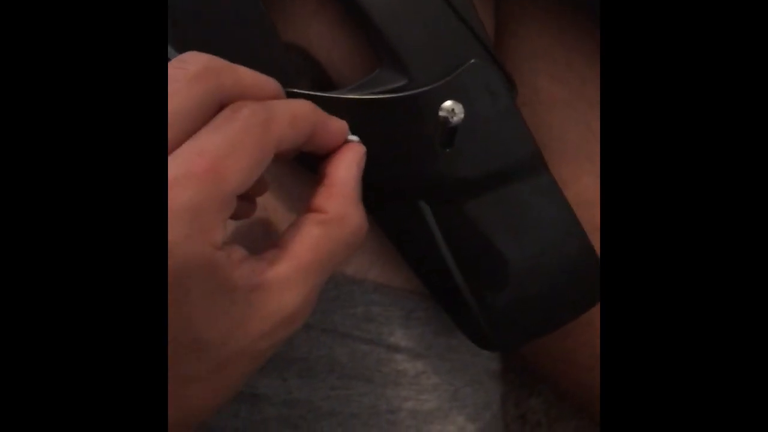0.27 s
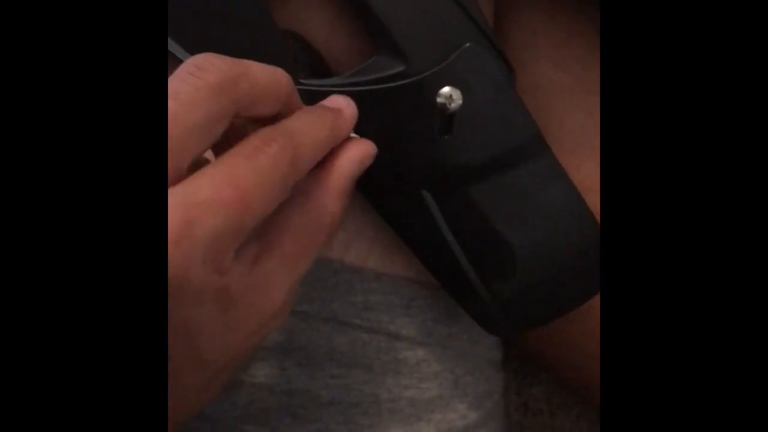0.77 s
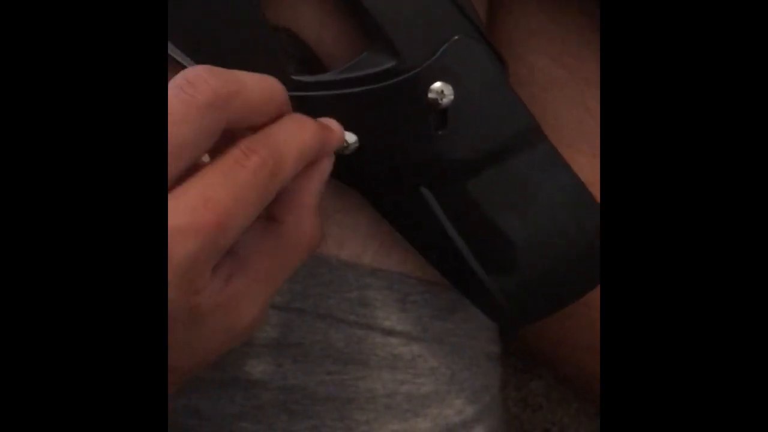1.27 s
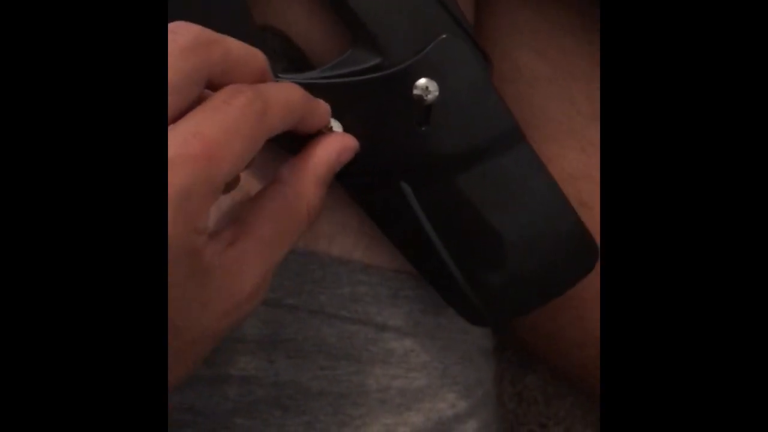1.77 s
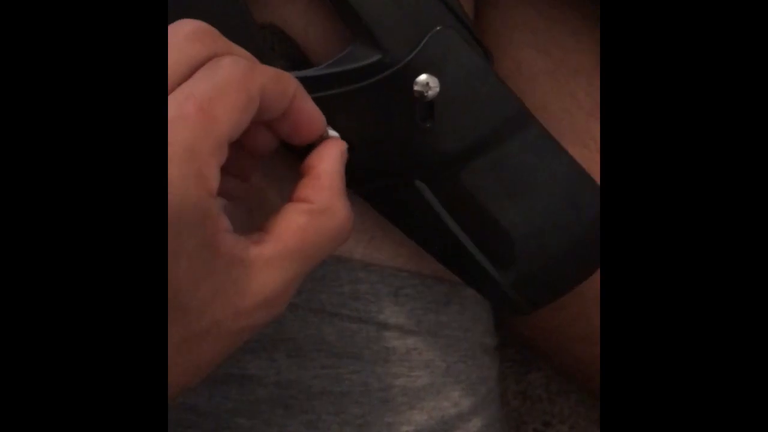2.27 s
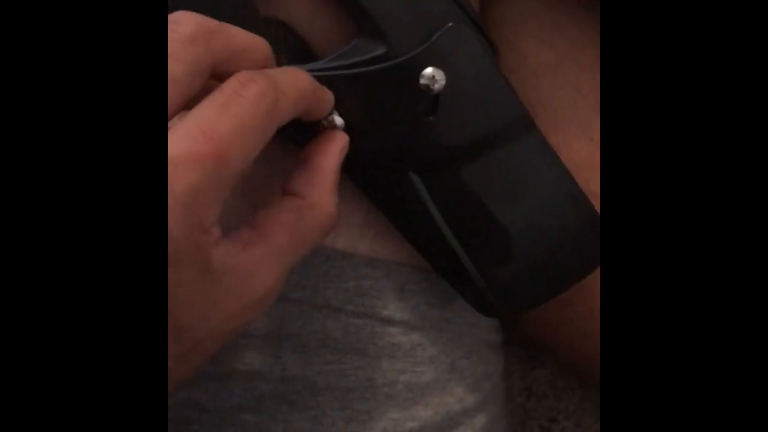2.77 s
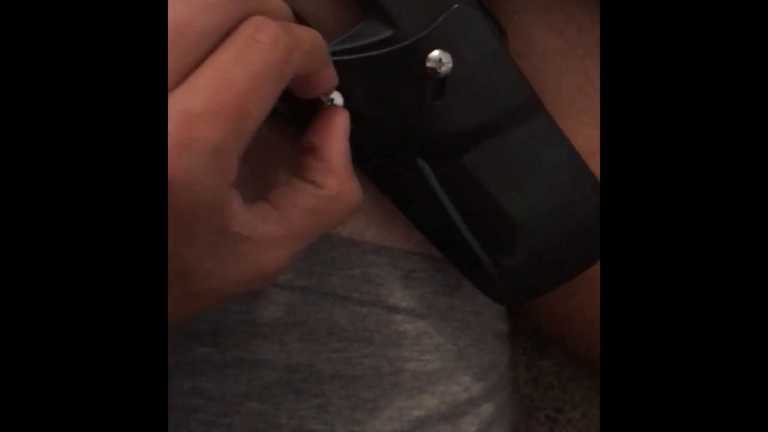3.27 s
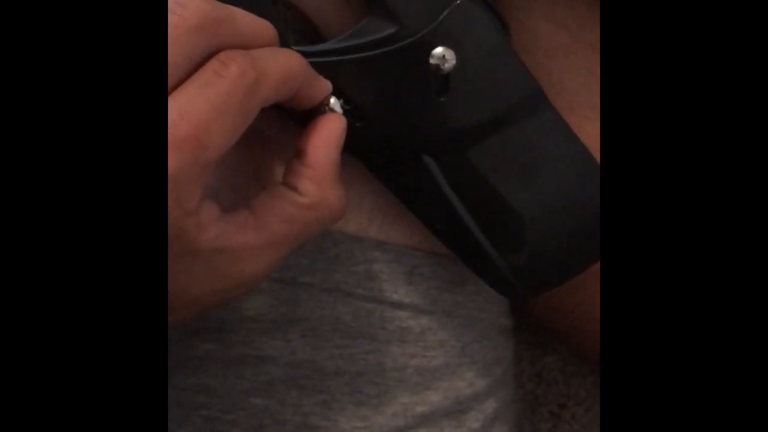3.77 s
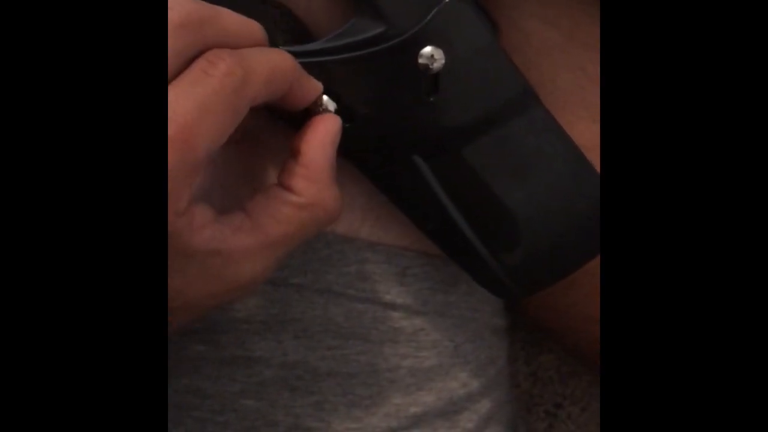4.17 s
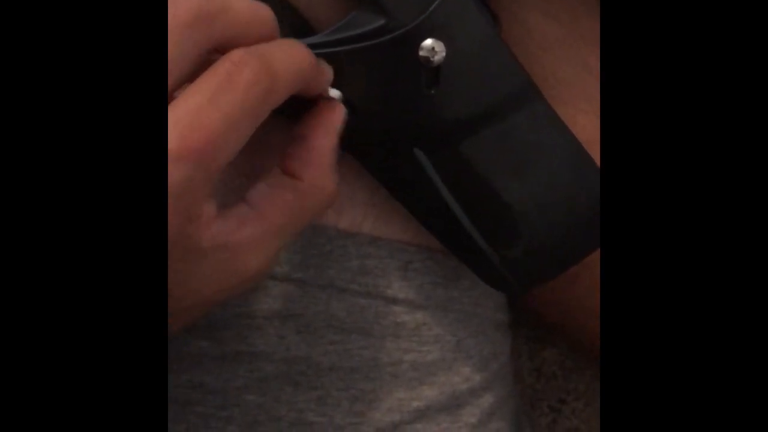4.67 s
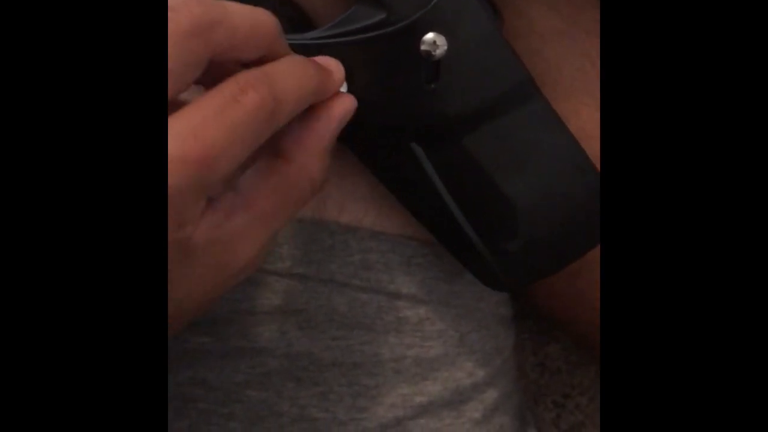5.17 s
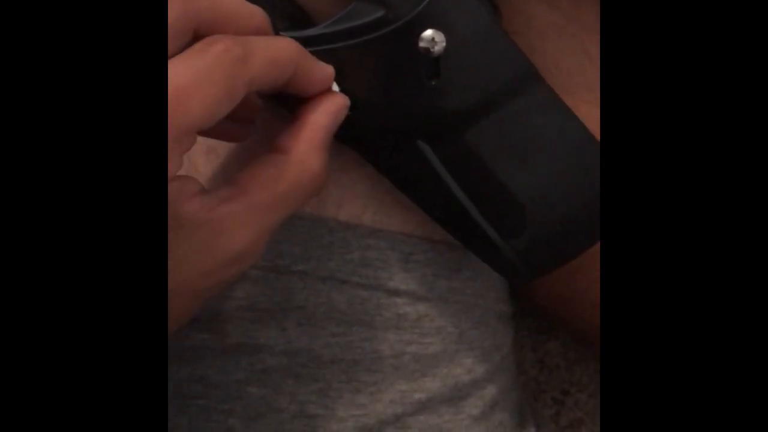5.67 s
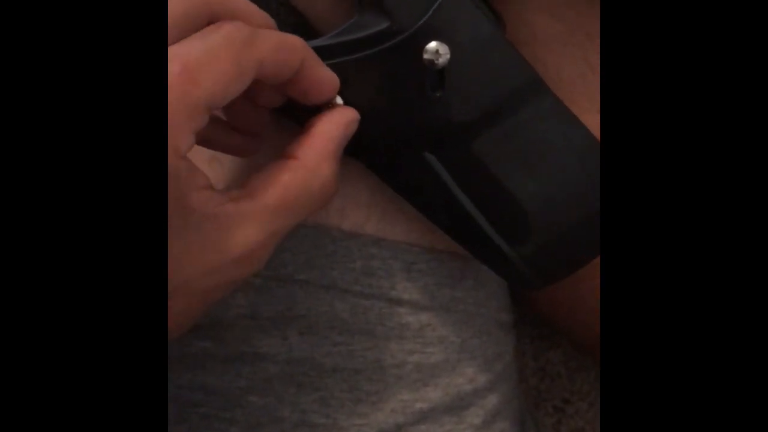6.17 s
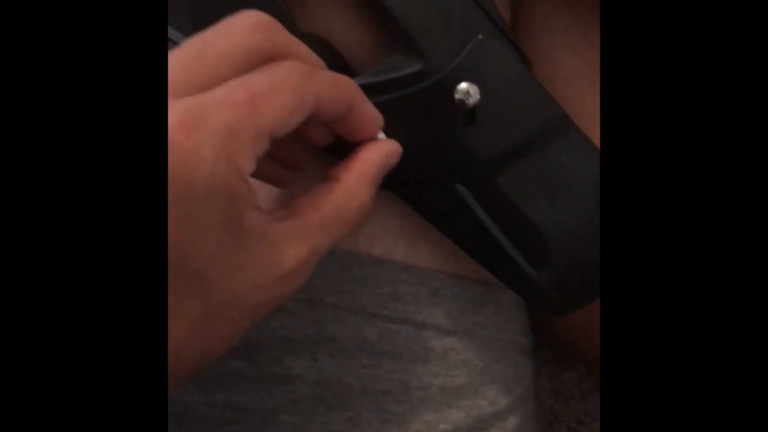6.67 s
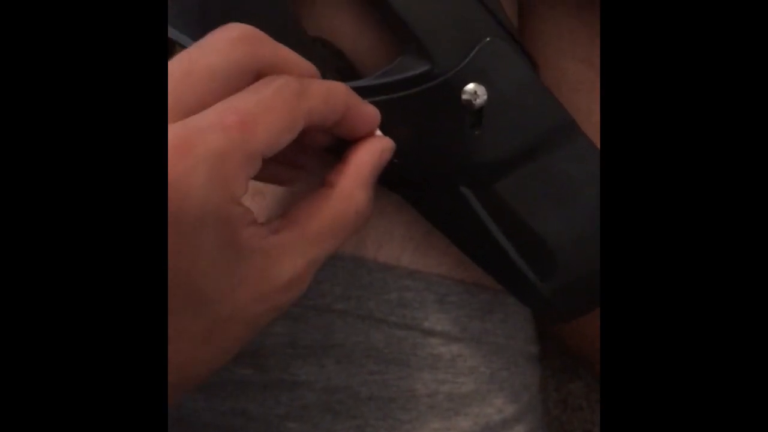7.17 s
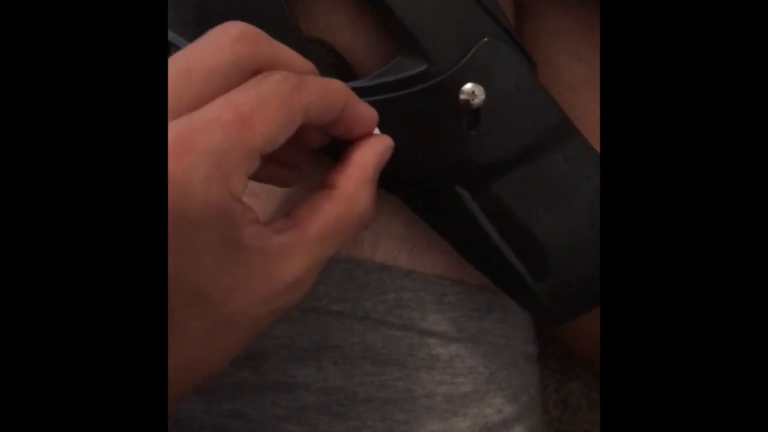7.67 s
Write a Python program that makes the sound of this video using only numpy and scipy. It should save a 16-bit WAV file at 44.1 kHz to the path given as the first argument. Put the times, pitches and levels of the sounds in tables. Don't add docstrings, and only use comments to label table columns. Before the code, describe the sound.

Light plastic taps and crisp metal ticks from a screw handled against a hollow hard shell on a lap. A busy rattling start gives way to a lone hard click and quick knocks, long near-silent pauses with faint finger touches and cloth brushes, then a scraping click and a late bright one. Close, dry indoor phone pickup, subdued hum, and thin hiss briefly opening after the loudest clicks.

```python
import sys
import numpy as np
from scipy import signal
from scipy.fft import rfft, irfft, next_fast_len
from scipy.io import wavfile
from scipy.ndimage import uniform_filter1d, map_coordinates

SR = 44100
rng = np.random.default_rng(int(sys.argv[2]) if len(sys.argv) > 2 else 0)


def how_loud(loudness_db):
    steps = np.asarray(loudness_db, float) / 20
    return 10 ** steps


def put_to_file(sound):
    columns = np.atleast_2d(sound).T
    safe = np.clip(columns, -1, 1)
    whole_steps = np.round(safe * 32767)
    wavfile.write(sys.argv[1], SR, whole_steps.astype(np.int16))


N = 348387
TIME = np.arange(N) / SR
BURST = 2048
AIR_TOP_HZ = 15750

# f/Hz, width/Hz, level/dB
SHELL = [(706, 120, -13), (982, 26, -11), (1320, 130, 3), (1693, 310, -1.5), (2246, 240, 3)]
# f/Hz, width/Hz, level/dB
PANEL = [(3380, 440, 4), (3660, 130, -0.5), (4100, 400, -2.5)]
# f/Hz, width/Hz, level/dB
RIM = [(5560, 380, 1.5), (6240, 250, -4.5), (6760, 220, -11.5)]
# f/Hz, width/Hz, level/dB
SCREW = [(7900, 430, -7.5), (8630, 440, 0.5), (9460, 700, -2.5), (11240, 900, -3.5), (12640, 550, -11),
         (15300, 900, -13)]


def unit(x):
    return x / np.sqrt(np.mean(x ** 2) + 1e-20)


def along(points, hz):
    f, value = np.transpose(points)
    return np.interp(np.log(hz + 1), np.log(f + 1), value)


def wobble(rate):
    knots = rng.standard_normal(int(N * rate / SR) + 4)
    return map_coordinates(knots, [TIME * rate])


def filtered(x, response):
    m = next_fast_len(N + 8192)
    return irfft(rfft(x, m) * response(np.fft.rfftfreq(m, 1 / SR)), m)[:N]


def mode(f, hz, width):
    return 1j * f * width / (hz * hz - f * f + 1j * f * width)


def span(start, end, edge):
    return np.clip(np.minimum(TIME - start, end - TIME) / edge, 0, 1)


def air(spectrum, patchy_db):
    z = signal.stft(rng.standard_normal(N + 512), nperseg=512)[2]
    patches = uniform_filter1d(rng.standard_normal(z.shape), 6, 0)
    patches = uniform_filter1d(patches, 10, 1)
    x = signal.istft(z * how_loud(patchy_db * unit(patches)), nperseg=512)[1][:N]
    return unit(filtered(x, lambda hz: how_loud(along(spectrum, hz))))


def hum():
    # f/Hz, level/dB
    hum_lines = [(59, -60), (96, -61.5), (119.5, -65.5), (141, -71.5)]
    # t/s, level/dB
    rumble = [(0.0, -52), (0.11, -58), (0.55, -62.5), (2.7, -58), (3.25, -67), (3.41, -62.5), (4.97, -58.5),
              (5.28, -66.5), (5.39, -55.5), (5.74, -61.5), (7.48, -58), (7.9, -61)]
    low_air = [(20, -38), (40, -3), (60, -1.5), (80, -2.0), (100, -32.5), (200, -91.5)]
    upper_air = [(60, -42.5), (85, 3), (130, -5.5), (160, -13.0), (220, -51.5), (400, -92.5)]
    upper_db = -0.5
    lines = []
    for hz, db in hum_lines:
        cycles = hz * TIME + .15 * wobble(5)
        lines.append(how_loud(db + 2.5 * wobble(5)) * np.sin(2 * np.pi * cycles))
    low = unit(unit(lines[0]) + 0.95 * air(low_air, patchy_db=1.0))
    upper = unit(unit(sum(lines[1:])) + .7 * air(upper_air, patchy_db=3))
    s, level_db = np.transpose(rumble)
    return how_loud(np.interp(TIME, s, level_db)) * (low + how_loud(upper_db) * upper)


def background():
    # f/Hz, density/dB per Hz
    quiet_air = [(94, -31), (160, -0.5), (173, -3), (351, -8), (600, -15.5), (636, -12), (864, -16),
                 (1050, -15), (1480, -19.5), (2480, -24), (7680, -27), (15600, -25)]
    # f/Hz, density/dB per Hz
    full_air = [(120, -32), (200, 1.5), (386, -2.5), (799, -7.5), (1010, -7.5), (1330, -9.5), (5830, -11.5),
                (7660, -13), (15600, -17.5)]
    # f/Hz, width/Hz, gain/dB (negative is a dip)
    humps_and_dips = [(7560, 790, -3.5), (9003, 170, 3), (10800, 1400, -6), (12970, 200, 2.5)]
    loudest = [
        .712,
        2.334,
        7.272,
    ]
    # start/s, end/s, level/dB
    linger = [
        (1.123, 1.251, -58),
        (2.744, 2.83, -64.5),
    ]
    quiet_db, hold_s, open_db = -66, .41, -62

    def uneven_gain(f):
        return how_loud(sum(db * np.exp(-((f - hz) / w) ** 2) for hz, w, db in humps_and_dips))

    quiet = filtered(air(list(quiet_air) + [(20000, -26.5)], patchy_db=0.8), uneven_gain)
    quiet = how_loud(quiet_db + 0.27 * wobble(2.1)) * quiet
    openings = list(linger) + [(s, s + hold_s, open_db) for s in loudest]
    released = sum(how_loud(db) * span(start, end, 0.0054) for start, end, db in openings)
    full = air(list(full_air) + [(20000, -19)], patchy_db=1.5)
    return filtered(quiet + released * full, lambda f: f < AIR_TOP_HZ)


def creep():
    slipping = rng.random(N) < 70 / SR * how_loud(6 * wobble(4))
    slips = slipping * rng.standard_normal(N) * how_loud(3 * rng.exponential(size=N))
    ticks = filtered(slips, lambda f: sum(how_loud(db) * mode(f, hz, w) ** 2 for hz, w, db in SHELL))
    return how_loud(-85.0) * unit(ticks)


def squeaks():
    # start/s, end/s, f/Hz, level/dB
    squeak_rows = [
        (.108, .146, 15000, -73),
        (5.22, 5.275, 15000, -77),
    ]
    out = np.zeros(N)
    for start, end, hz, db in squeak_rows:
        line = np.sin(2 * np.pi * (hz * TIME + 0.63 * wobble(250)))
        out += how_loud(db + 9 * wobble(120)) * span(start, end, .008) * line
    return out


def contacts():
    # t/s, shell/dB, rim/dB, screw/dB, chatter/ms
    clicks = [(0.2211, -33, -31, -31, 4), (0.713, -25, -12.5, -12, 1.5), (0.7184, -20.5, -15.5, -17.5, 1.7),
              (0.7282, -32.5, -34.5, -31, 3.4), (0.7757, -37.5, -40.5, -50.5, 3.8),
              (0.8407, -30.5, -29, -31.5, 3), (1.1162, -32, -25.5, -40, 3.7),
              (1.1241, -29, -16.5, -28, 2.2), (1.1389, -33, -25.5, -49, 4.6), (1.1592, -31, -30, -33, 1.9),
              (1.1745, -26.5, -19, -21.5, 5.4), (1.1934, -33.5, -29, -42, 1.9),
              (1.5393, -38, -39, -41, 2.7), (1.7129, -46, -41, -48.5, 1.1),
              (2.3337, -21, -14.5, -14.5, 1.1), (3.0987, -28, -32, -49.5, 4.8),
              (4.9221, -31, -20.5, -16.5, 0.7), (4.996, -27.5, -27, -32.5, 5.9),
              (5.0098, -21, -14, -18.5, 3.3), (6.6075, -40.5, -40, -43, 4.3),
              (6.8392, -45.5, -42.5, -51, 4.2), (7.2724, -20, -13.5, -9.5, 0.6),
              (7.3396, -38, -37.5, -43.5, 2.4), (7.3939, -42, -38, -38, 1.7)]
    # t/s, shell/dB, rim/dB
    tips = [(1.0406, -59, -53.5), (1.2729, -46, -49.5), (1.4031, -58, -51), (1.4543, -45, -45.5),
            (1.6696, -44.5, -42.5), (1.6979, -57.5, -49), (1.7053, -50, -51), (1.91, -51, -50.5),
            (2.7248, -53, -48.5), (2.7279, -49.5, -50), (4.8576, -75, -54.5), (5.4721, -62, -54),
            (5.5987, -56, -54.5), (7.2491, -74, -60), (7.5117, -51, -49)]
    # t/s, shell/dB, note of the struck spot f/Hz, edge/dB, chatter/ms
    knocks = [(0.1459, -31.5, 2220, -39.5, 3.8), (0.1492, -40, 1910, -59, 5.8),
              (0.3789, -43.5, 1270, -52.5, 4.6), (0.7086, -28, 1550, -40, 2.5),
              (0.833, -35.5, 2100, -38.5, 2.6), (1.1443, -37, 1370, -42, 2.8),
              (1.1496, -37, 1650, -49, 4.2), (1.1961, -37, 1610, -53, 5.5),
              (1.2879, -43.5, 1320, -51.5, 6.8), (1.3867, -39.5, 1390, -46, 3.1),
              (2.3423, -33, 1290, -50, 6.8), (2.5736, -41.5, 1920, -44.5, 10),
              (2.5894, -32, 2090, -36.5, 1.87), (2.6058, -40, 1870, -48, 3.9),
              (2.6122, -38, 1620, -54, 1.8), (2.6191, -28.5, 2240, -33, 3.9), (2.7549, -45, 1000, -54, 2.1),
              (3.3793, -43.5, 1730, -54.5, 4.86), (4.4787, -38.5, 960, -48.5, 3.1),
              (4.9186, -26.5, 2290, -58, 0.9), (5.0876, -41.5, 1354, -54, 4.8),
              (6.5969, -43.5, 1710, -51, 3.9), (6.9172, -43.5, 998, -47.5, 2.5),
              (7.5557, -44, 1820, -45.5, 5.5)]
    # t/s, shell/dB, note f/Hz, edge/dB
    nail_taps = [(0.3983, -49, 2170, -67), (0.557, -49.5, 1180, -70.5), (1.1642, -42, 1320, -51),
                 (1.2534, -45.5, 1310, -54), (1.2593, -47, 1340, -58), (1.4485, -44.5, 1300, -68),
                 (1.5262, -48.5, 1320, -53.5), (1.7433, -51, 1340, -56), (1.7478, -49.5, 1210, -65),
                 (2.2131, -50, 2240, -52), (2.4061, -49, 1790, -67), (2.5132, -51.5, 1280, -60),
                 (2.597, -45, 1340, -62), (2.7676, -47, 1350, -55), (2.813, -56, 2230, -57),
                 (2.8173, -50, 2260, -53), (3.3912, -50.5, 1010, -79), (3.3959, -52, 2330, -65),
                 (4.2495, -52, 1360, -59.5), (4.6964, -49.5, 1280, -59), (4.781, -44.5, 1370, -56.5),
                 (4.8342, -53, 1160, -63.5), (5.1446, -51, 1350, -61), (5.5248, -48.5, 2200, -51),
                 (6.4818, -56, 1310, -57.5), (6.897, -51.5, 1270, -65), (7.3438, -46, 1650, -62),
                 (7.5423, -44.5, 1310, -53), (7.5485, -51, 1810, -52), (7.7169, -45, 1380, -54.5)]
    # t/s, shell/dB, note f/Hz
    touches = [(0.2296, -57, 1270), (0.4064, -60, 1350), (0.4627, -56, 1200), (0.5666, -53.5, 1290),
               (1.0884, -52, 1420), (1.3924, -51, 1310), (1.4059, -53, 1280), (1.5485, -54, 1310),
               (1.5802, -56, 1340), (2.1968, -55, 1770), (2.9852, -56, 1160), (3.0052, -56, 1240),
               (3.1347, -58.5, 1500), (3.1806, -52.5, 1220), (3.5143, -56.5, 1220), (3.8439, -56.5, 1350),
               (4.3457, -52, 1710), (4.3665, -56, 1360), (4.3984, -54, 990), (4.5589, -54.5, 1320),
               (4.7922, -55, 1670), (5.4604, -59, 1210), (5.6014, -54.5, 1600), (5.7345, -60, 1350),
               (5.8831, -59.5, 1720), (6.1171, -57, 970), (6.9118, -57.5, 960), (7.5208, -50, 1170),
               (7.723, -51, 1270), (7.7321, -51, 1280)]
    tip_ms, tick_ms, touch_ms = 2.8, 4.2, 5.5
    tip_screw_db, knock_screw_db = -8, -6.5
    touch_edge_db = -13.5
    panel_under_db = -2
    spot_gain = 3.4
    panel_db, panel_db_per_octave = 0.1, 3
    main_hz = SHELL[2][0]

    metal = list(clicks)
    metal += [(s, shell, rim, rim + tip_screw_db, tip_ms) for s, shell, rim in tips]
    plastic = list(knocks)
    plastic += [(s, shell, hz, edge, tick_ms) for s, shell, hz, edge in nail_taps]
    plastic += [(s, shell, hz, shell + touch_edge_db, touch_ms) for s, shell, hz in touches]
    rows = []
    for s, shell, rim, screw, ms in metal:
        rows.append((s, shell, main_hz, 0, (shell + rim) / 2 + panel_under_db, rim, screw, ms))
    for s, shell, hz, edge, ms in plastic:
        lean_db = panel_db + panel_db_per_octave * np.log2(hz / main_hz)
        rim = edge - lean_db
        rows.append((s, shell, hz, spot_gain, edge + lean_db, rim, rim + knock_screw_db, ms))
    return np.array(rows)


def chatter(ms):
    t = np.arange(BURST) / SR
    draw = rng.standard_normal((len(ms), 2, BURST))
    life = np.clip(0.88 * ms - 1.1, .25, 9) / 1000
    grit = draw[:, 0] * how_loud(6.3 * draw[:, 1])
    grit = grit * (1 - np.exp(-t / (0.091 * life))) * (t < BURST / SR / 2)
    blow = 1.7 * (np.arange(BURST) == np.round(8 + .25 * life * SR))
    force = blow + grit * how_loud(-12 * t / life)
    trail = grit * how_loud(-60 * t / 0.027)
    return force, trail


def ringing(force, modes, scatter_db, detune, snap, spot_hz=1000, spot=0):
    f = np.fft.rfftfreq(BURST, 1 / SR)
    chance = rng.standard_normal((len(force), 2 * len(modes)))
    response = snap + spot * mode(f, spot_hz, 150)
    for k, (hz, width, db) in enumerate(modes):
        centre = hz * (1 + detune * chance[:, [2 * k]])
        strength = how_loud(db + scatter_db * chance[:, [2 * k + 1]])
        response = response + strength * mode(f, centre, width)
    low, high = modes[0][0], modes[-1][0]
    skirt = mode(f, np.sqrt(low * high), 1.2 * (high - low) + modes[0][1])
    ring = irfft(rfft(force) * response * skirt ** 2, BURST)
    return ring / np.linalg.norm(ring, axis=1, keepdims=True) * np.sqrt(SR / 1000)


def taps(rows, force, trail, scatter_db, snap):
    # f/Hz, width/Hz, level under the shell/dB
    thud = (280, 220, -21.5)
    s, shell_db, spot_hz, spot, panel_db, rim_db, screw_db, ms = rows.T[:, :, None]
    hit = how_loud(shell_db + thud[2]) * ringing(force, [thud], 0, 0.21, 0)
    shell_force = force + how_loud(-8) * trail
    hit += how_loud(shell_db) * ringing(shell_force, SHELL, scatter_db, 0.021, 0.54 * snap, spot_hz, spot)
    small_parts = [(panel_db, PANEL, -20), (rim_db, RIM, -26), (screw_db, SCREW, -27)]
    for db, part, trail_db in small_parts:
        hit += how_loud(db) * ringing(force + how_loud(trail_db) * trail, part, scatter_db, 0.025, snap)
    where = np.round(s * SR).astype(int) - 8 + np.arange(BURST)
    return np.bincount(where.ravel(), hit.ravel(), N + BURST)[:N]


def room(x):
    # f/Hz, t60/s
    decay = [(300, 0.7), (1500, .25), (6000, .22), (14000, 0.22)]
    hz, t, z = signal.stft(rng.standard_normal(SR // 2), SR, nperseg=256)
    fading = how_loud(-60 * t / along(decay, hz)[:, None])
    tail = signal.istft(z * fading, SR, nperseg=256)[1]
    tail = tail * (1 - 0.61 * np.exp(-np.arange(len(tail)) / SR / 0.0088))
    delayed = np.pad(x, (420, 0))
    wet = signal.fftconvolve(delayed, tail / np.linalg.norm(tail))[:N]
    return filtered(wet, lambda f: f < AIR_TOP_HZ)


def drags():
    # start/s, end/s, level at the end/dB, top f/Hz
    drag_rows = [
        (.665, .711, -46, 3500),
        (.824, .84, -50, 5000),
        (4.985, 4.996, -52, 4000),
        (5.002, 5.0115, -27, 9000),
        (6.585, 6.597, -55, 4000),
    ]
    grit = rng.standard_normal(N) * how_loud(4.2 * rng.standard_normal(N))

    def all_parts(f):
        modes = SHELL + PANEL + RIM + SCREW
        return 0.28 * (f > 800) + sum(how_loud(db) * mode(f, hz, w) for hz, w, db in modes)

    out = np.zeros(N)
    for start, end, db, top_hz in drag_rows:
        to_go = np.clip((end - TIME) / (end - start), 0, 1)
        swell = how_loud(db - 17 * to_go) * span(start, end, .001)
        out += swell * unit(filtered(grit, lambda f: all_parts(f) / (1 + (f / top_hz) ** 4)))
    return out


def thumps():
    # t/s, f/Hz, level/dB
    bumps = [
        (2.445, 60.6, -38.5),
        (5.39, 76, -46.5),
        (3.4, 76, -57),
    ]
    width = .017
    out = np.zeros(N)
    for s, hz, db in bumps:
        swell = np.exp(-((TIME - s - width) / width) ** 2)
        out += how_loud(db) * swell * np.sin(2 * np.pi * hz * TIME)
    return out


def brushes():
    # start/s, end/s, f/Hz, width/Hz, level/dB
    strokes = [
        (2.74, 3.2, 450, 500, -72),
        (2.76, 3.12, 4700, 500, -80),
        (3.38, 3.62, 6000, 1300, -79),
        (4.64, 4.88, 6000, 1300, -80),
        (5.58, 5.7, 5900, 1200, -79),
        (5.7, 5.84, 3600, 700, -79),
        (5.86, 6.0, 5900, 1200, -79),
        (6.75, 7.0, 450, 500, -74),
    ]
    out = np.zeros(N)
    for start, end, hz, w, db in strokes:
        band = unit(filtered(rng.standard_normal(N), lambda f: mode(f, hz, w) ** 2))
        out += how_loud(db + 2.2 * wobble(25)) * span(start, end, 0.056) * band
    return out


def scene():
    rows = contacts()
    force, trail = chatter(rows[:, 7:])
    near = taps(rows, force, trail, scatter_db=2.5, snap=.25)
    pulse = np.ones((len(rows), 1)) * (np.arange(BURST) == 0)
    all_round = taps(rows, pulse, 0, scatter_db=0.0, snap=0.67)
    rub = drags() + creep() + brushes()
    answer = how_loud(-20.5) * room(all_round + rub)
    mix = near + rub + answer + squeaks() + hum() + thumps() + background()
    return mix[None]


def roll_off(x):
    return signal.sosfilt(signal.butter(12, 17120, fs=SR, output="sos"), x)


def record(dry):
    top_hz, slope_hz = 16950, 900
    clipped = np.clip(dry[0], -.99, .99)
    mix = filtered(clipped, lambda f: np.clip((top_hz - f) / slope_hz, 0, 1) ** 2)
    return roll_off(mix[None])


dry = scene()
out = record(dry)
put_to_file(out)
```